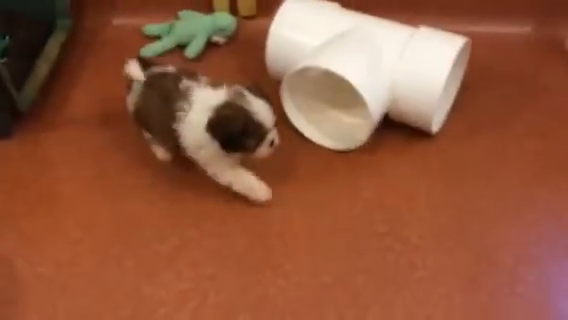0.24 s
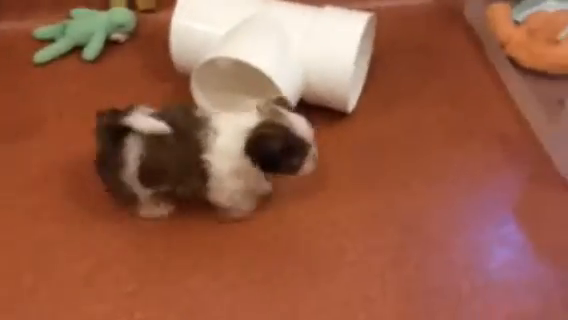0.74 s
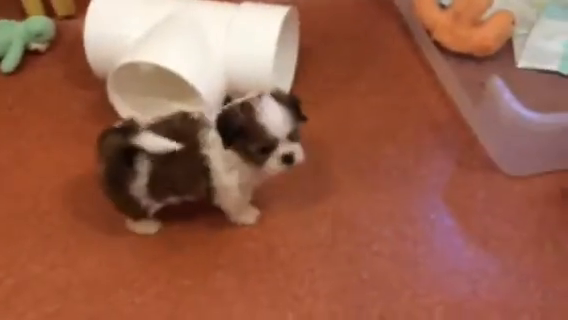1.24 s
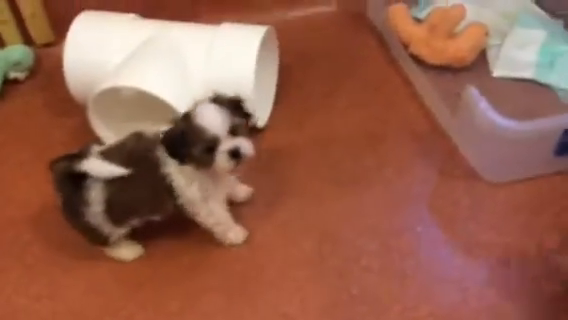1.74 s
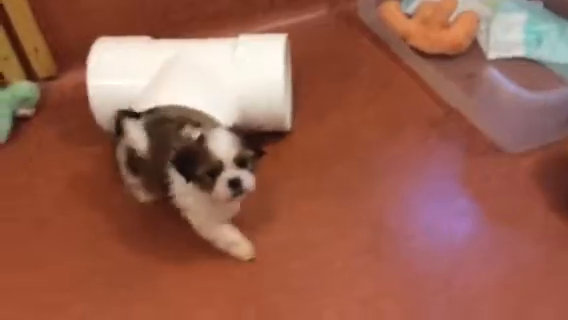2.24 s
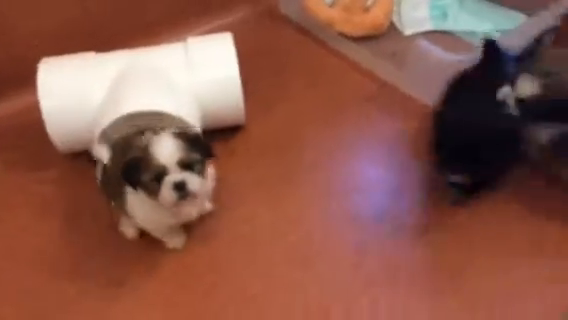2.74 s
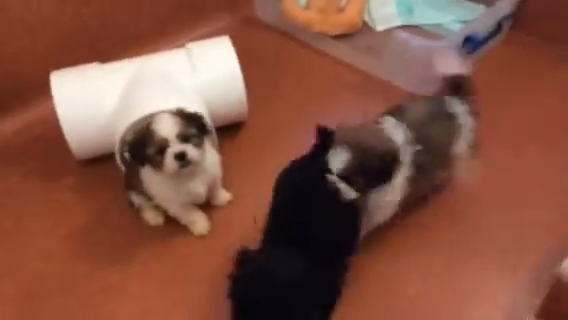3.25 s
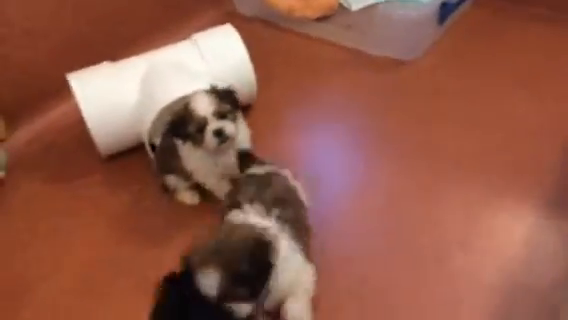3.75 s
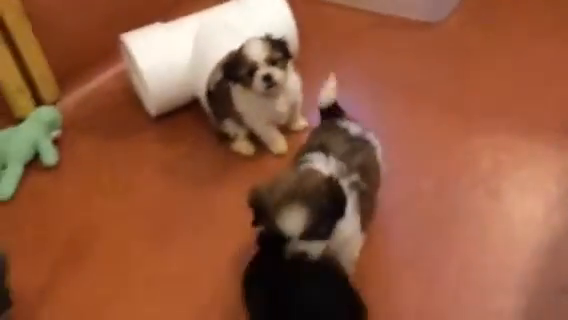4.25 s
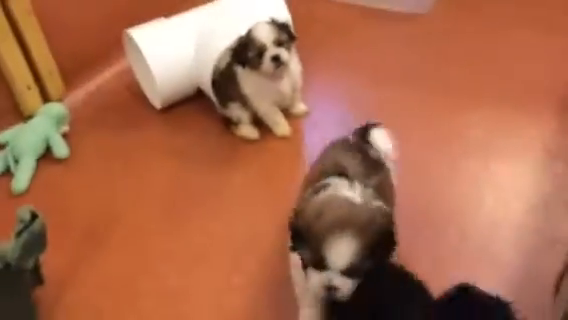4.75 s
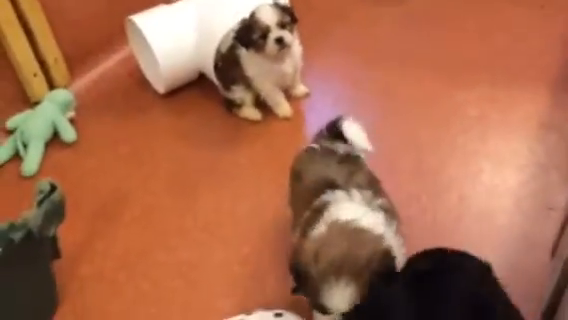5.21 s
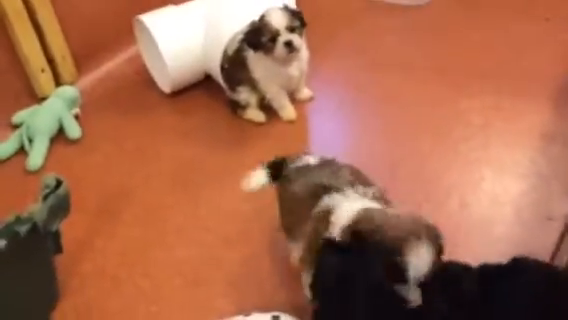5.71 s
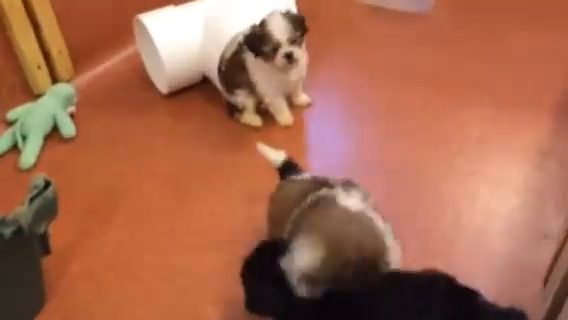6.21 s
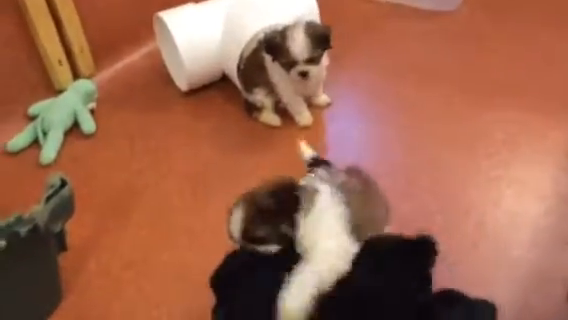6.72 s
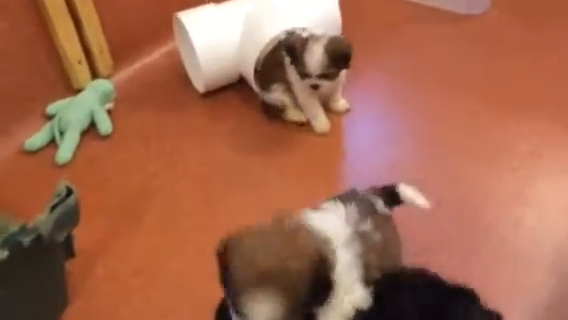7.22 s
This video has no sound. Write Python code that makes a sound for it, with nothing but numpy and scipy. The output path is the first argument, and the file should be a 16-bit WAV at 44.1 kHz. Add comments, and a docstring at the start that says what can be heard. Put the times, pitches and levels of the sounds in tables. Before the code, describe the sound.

Light paws patter and bodies flop on a resonant floor, claws clicking, a plastic pipe bumped, brief puppy grunts in a small room.

```python
"""Puppies tussling on a hard floor

Small puppies scamper and tussle indoors, close to the microphone, in a small room that answers.
Paws and bodies thump the boards as damped modes; claws tick as short noise bursts; friction is clumped noise.
A bumped plastic pipe rings through broad resonances, a bit of metal chimes through a narrow one, and
short pops are damped sines. A puppy grunts softly now and then on a gliding, hoarse tone."""
import sys
import numpy as np
from scipy import signal
from scipy.fft import rfft, irfft, next_fast_len
from scipy.io import wavfile
from scipy.ndimage import uniform_filter1d, map_coordinates

SR = 44100
rng = np.random.default_rng(int(sys.argv[2]) if len(sys.argv) > 2 else 0)


def dump(signal):
    """Clip the signal to [-1, 1] and save it as 16-bit WAV at the path in sys.argv[1]."""
    limited = np.clip(np.atleast_2d(signal).T, -1, 1)
    pcm = np.round(limited * 32767).astype(np.int16)
    wavfile.write(sys.argv[1], SR, pcm)


N = 329427  # length [samples]
RING = np.arange(SR // 2) / SR  # time since a blow [s]
TOP_HZ = 15600  # band limit

# colour of the quiet room air: (frequency [Hz], relative density [dB])
AIR_COLOUR = [(25, -4), (80, 6.5), (200, -0.5), (450, -3), (900, -16), (2000, -15.5), (5000, -27),
              (10000, -28.5), (15500, -17)]
# reverberation of the small room: (frequency [Hz], 60 dB decay time [s])
ROOM_DECAY = [(80, 0.31), (250, 0.33), (1000, 0.23), (5000, 0.17), (14000, 0.12)]
# modes of the sprung floor: (frequency [Hz], relative level [dB], 60 dB decay time [s])
BOARD_MODES = [(60, -8, 0.19), (85.3, 11.5, 0.14), (121.5, 5.5, 0.15), (173.2, -1, 0.072),
               (195.5, 1.5, 0.13), (252.3, -5, 0.11), (287.5, -6, 0.17), (317.8, 0, 0.21),
               (388, -13.5, 0.25), (466, -10, 0.1)]

# how busy the puppies are: (time [s], drive of dragging bodies [dB], drive of scuffing paws [dB])
BUSTLE_CURVE = [(0.0, -58.5, -65), (1.0, -61, -61), (1.23, -55, -57), (1.74, -66, -60), (1.98, -50, -60),
                (2.33, -53, -59), (2.81, -55, -60), (3.18, -51.5, -56.5), (3.72, -43.5, -55),
                (4.24, -63.5, -63.5), (4.58, -73, -64), (4.72, -55.5, -67.5), (5.12, -57, -63.5),
                (5.49, -65, -70), (5.93, -57.5, -67), (6.78, -73.5, -70), (7.26, -74.5, -68.5),
                (7.47, -52, -71)]
# colour of bodies dragging: (frequency [Hz], relative density [dB])
DRAG_COLOUR = [(25, -33), (50, -1), (85, -1.5), (135, -8.5), (200, -3.5), (300, -16), (450, -23.5),
               (900, -66)]
# colour of pads and fur rubbing: (frequency [Hz], relative density [dB])
RUB_COLOUR = [(150, -22), (400, -5.5), (700, 0), (1200, -1), (2200, -4.5), (3500, -8.5), (8000, -14)]
# colour of claws scratching: (frequency [Hz], relative density [dB])
SCRATCH_COLOUR = [(1200, -3.5), (2800, 1), (5200, 1), (7200, 1), (10500, -7.5), (12500, -20), (15000, -3)]
# lively scuffing drive; how steeply scuffing follows the bustle around it
BUSY_DB, SCUFF_GROWS = -58, 1.06
# each kind of friction against the bustle
DRAG_DB, RUB_DB, SCRATCH_DB, TIPS_DB = -1.5, -3.5, -3.5, -16
# the boards' answer to the dragging; how unevenly a body drags
RUMBLE_DB, DRAG_SWAY_DB = -4.5, 2.5

# longer slides of a paw or a toy:
# (middle time [s], nominal length [s], level [dB], centre frequency [Hz], width [octaves])
SLIDE_EVENTS = [(0.353, 0.057, -56.5, 420, 0.78), (0.426, 0.08, -61, 850, 1.5),
                (0.522, 0.05, -55, 1260, 0.62), (1.18, 0.2, -55.5, 1370, 0.96),
                (1.331, 0.12, -56.5, 1290, 0.84), (1.4, 0.3, -61.5, 5060, 0.24),
                (1.406, 0.36, -63, 14000, 0.26), (1.892, 0.037, -42.5, 685, 1.36),
                (1.983, 0.098, -54, 800, 2.3), (2.275, 0.092, -47.5, 1890, 1.8),
                (2.475, 0.22, -53.5, 774, 2.5), (3.245, .12, -58, 895, 2.1),
                (4.148, 0.078, -57.5, 5340, 2.2), (4.347, 0.099, -60.5, 4820, 3.5),
                (5.15, .12, -61.5, 2480, 3.2), (5.385, 0.11, -64.5, 5900, 14), (5.952, 0.11, -57, 3150, 4),
                (7.363, 0.14, -65.5, 1420, 1.5)]

# soft grunts: (time [s], length [s], middle pitch [Hz], glide [octaves], relative level [dB])
GRUNT_EVENTS = [(1.25, 0.088, 274.7, 0.148, -42), (1.317, 0.067, 300, 0.077, -38),
                (1.414, 0.057, 298, 0.066, -44.5), (1.474, 0.083, 225, -0.48, -39.5),
                (6.368, 0.088, 209, -0.3, -46), (7.301, 0.1, 195.6, -.1, -45.5)]
# share of its length at which a grunt is loudest; how much softer it starts and ends
GRUNT_CREST, GRUNT_FADE_DB = 0.58, 9

# small metal clinks: (time [s], relative level [dB], click against chime [dB], ring frequency [Hz])
CLINK_EVENTS = [(5.0097, -46, -4, 8000), (5.0139, -29, -4, 11000), (5.0374, -27.5, -4.5, 12200),
                (5.210, -54, -4.5, 11200), (5.7046, -36.5, -6, 11100), (6.037, -51, 0, 11000)]

# short pitched pops and taps: (time [s], level [dB], pitch [Hz], relative tick level [dB])
POP_EVENTS = [(0.4958, -40, 1240, -60), (1.069, -43, 1030, -70), (4.031, -46, 620, -74),
              (4.895, -47, 500, -60), (5.82, -47, 3700, -64), (5.821, -47.5, 695, -61),
              (5.866, -51.5, 790, -65), (6.179, -42, 4900, -38.5)]
POP_BODY_DB, POP_EDGE_DB = -22, -9.5  # under and over the middle of a pop's tick

# hollow knocks on plastic: (time [s], relative level [dB], crack against hollow ring [dB])
KNOCK_EVENTS = [(0.615, -47, -13), (1.141, -43, -5.5), (1.807, -36.5, 5.5), (1.873, -43.5, 5),
                (1.913, -25.5, -10), (1.929, -31.5, 1), (1.998, -23, -8.5), (2.043, -30, -8.5),
                (2.255, -38.5, -2), (2.422, -43, -4), (3.185, -43.5, -2), (3.226, -41.5, -16),
                (3.505, -37, -8.5), (3.531, -43, 0.5), (3.791, -47, -20)]
# resonances of the plastic pipe: (frequency [Hz], bandwidth [Hz], relative level [dB])
PLASTIC_MODES = [(666, 110, 1.5), (817, 70, 2.5), (899, 97, 2.5), (1113, 160, -0.5), (1454, 140, -2.5),
                 (1870, 200, -6), (2470, 420, -11.5)]
KNOCK_FLOOR_DB = -5  # the plastic also raps the floor under it

# a claw catches on its own: (time [s], relative level [dB], brightness [dB])
TICK_EVENTS = [(0.141, -47, -4.5), (0.2163, -49, 5), (.5222, -50, -12.5), (1.6203, -44.5, 7.5),
               (1.769, -51, 6), (1.9863, -40, 4.5), (2.0154, -41.5, 7), (2.0203, -44, 5),
               (2.045, -40.5, 5.5), (2.2185, -49.5, 4), (2.4086, -49, -11), (2.528, -53, 8),
               (2.8944, -47, 6.5), (3.6536, -45, 3.5), (3.7576, -37.5, -2.5), (3.8423, -45.5, 1),
               (4.0246, -52.5, 2), (4.1093, -49.5, -0.5), (4.273, -53, -3), (4.6847, -45.5, -1.5),
               (6.767, -53, 4), (6.89, -54, 6.5), (6.9681, -49, 10)]
# under and over the middle of a tick; brightness tips one against the other
CLAW_BODY_DB, CLAW_EDGE_DB = -9, -3.5
CLAW_SKID_DB = -4.5  # the skid after a tick, before filtering

# footsteps, pad and claws landing together: (time [s], relative pad level [dB], relative claw level [dB])
STEP_EVENTS = [(.611, -38, -67), (.733, -39.5, -48), (0.91, -33.5, -42), (1.108, -36.5, -45.5),
               (1.694, -34.5, -40.5), (1.805, -33, -43), (2.325, -33.5, -47.5), (2.589, -39.5, -46),
               (2.741, -35.5, -53), (2.866, -28, -49), (2.954, -31.5, -39), (3.051, -38, -49.5),
               (4.892, -38.5, -47), (5.031, -28, -47), (5.213, -40.5, -60), (5.707, -42.5, -57),
               (5.821, -39.5, -46.5), (5.866, -43.5, -47), (6.473, -42, -50)]
# relative deep modes, upper slap and claw sharpness of every step
STEP_BOOM_DB, STEP_SLAP_DB, STEP_BRIGHT_DB = -14.5, -11, 0.5
STEP_TAP_DB = -24.5  # the short woody tap of a pad

# a body drops or rolls onto the floor: (time [s], relative level [dB], relative deep boom [dB])
FLOP_EVENTS = [(0.296, -60, 8), (0.934, -43.5, 1), (1.14, -37, -3.5), (1.884, -33.5, 3),
               (1.915, -19.5, -21), (1.937, -25, -3), (1.999, -25.5, -1), (2.038, -11, -21.5),
               (3.197, -31.5, -14.5), (3.226, -24.5, -20), (3.257, -31, -10), (3.505, -32, -7),
               (3.546, -44, -2), (3.79, -19, -6), (3.801, -17.5, -13.5), (4.122, -41.5, -7.5),
               (4.524, -42.5, -2), (4.738, -32.5, -3), (5.06, -41, -6), (5.174, -43.5, -23),
               (5.6, -50.5, 3), (6.07, -34.5, -8.5), (7.268, -48.5, -7)]
FLOP_SLAP_DB = -15.5  # a furry body barely wakes the upper modes


def amp(db):
    """Decibels to gain."""
    return 10 ** (np.asarray(db) / 20)


def unit(x):
    """x at rms 1."""
    return x / np.sqrt(np.mean(x ** 2) + 1e-20)


def strength(x):
    """A blow scaled so that its loudest 4 ms have rms 1."""
    return x / np.sqrt(uniform_filter1d(x ** 2, SR // 250).max() + 1e-20)


def along(points, hz):
    """(Hz, value) points read on a log frequency axis."""
    point_hz, values = np.transpose(points)
    return np.interp(np.log(hz + 1), np.log(point_hz + 1), values)


def curves(rows):
    """One value per sample for each column after the time."""
    times, *columns = np.transpose(rows)
    return [np.interp(np.arange(N) / SR, times, column) for column in columns]


def noise():
    """White noise as long as the scene."""
    return rng.standard_normal(N)


def wobble(rate):
    """A smooth random curve, rate knots a second."""
    knots = rng.standard_normal(int(N * rate / SR) + 4)
    return map_coordinates(knots, [np.arange(N) * rate / SR])


def filtered(x, response):
    """x shaped by a complex response of frequency."""
    size = next_fast_len(len(x) + 8192)
    spectrum = rfft(x, size) * response(np.fft.rfftfreq(size, 1 / SR))
    return irfft(spectrum, size)[:len(x)]


def coloured(x, colour):
    """x given a spectral colour, at rms 1."""
    return unit(filtered(x, lambda hz: amp(along(colour, hz))))


def band(x, lo_hz, hi_hz):
    """Causal band-pass."""
    return signal.sosfilt(signal.butter(3, [lo_hz, hi_hz], 'band', fs=SR, output='sos'), x)


def burst(t60, attack):
    """Noise that rises quickly and dies away; both times in seconds."""
    return rng.standard_normal(len(RING)) * amp(-60 * RING / t60) * (1 - np.exp(-RING / attack))


def ring(modes, scatter_db, detune):
    """Damped modes whose strength and pitch are scattered, as by the place that is struck."""
    out = np.zeros(len(RING))
    for hz, db, t60 in modes:
        decay = amp(db + scatter_db * rng.normal() - 60 * RING / t60)
        out += decay * np.sin(2 * np.pi * hz * (1 + detune * rng.normal()) * RING)
    return out


def in_room(x, wet_db):
    """A blow with its own diffuse tail, each frequency dying at its own speed."""
    hz, t, z = signal.stft(rng.standard_normal(len(RING)), SR, nperseg=256)
    fading = z * amp(-60 * t / along(ROOM_DECAY, hz)[:, None])
    tail = signal.istft(fading, SR, nperseg=256)[1][:len(RING)]
    tail = tail * (1 - np.exp(-RING / 0.002))  # the tail builds up in about 2 ms
    return x + amp(wet_db) * signal.fftconvolve(x, tail / np.linalg.norm(tail))[:len(x)]


def add(track, s, x):
    """Mix x into the track at time s."""
    part = track[max(round(s * SR), 0):][:len(x)]
    part += x[:len(part)]


def room_air():
    """Steady coloured noise makes the quiet air of the room."""
    return amp(-66.5) * coloured(noise(), AIR_COLOUR)


def scuff_grains(clump_db):
    """Noise whose level flutters fast and sways slowly, like clumps of tiny slips."""
    return noise() * amp(clump_db * wobble(260) + 3.1 * wobble(22.053))


def scuffs():
    """Pads, claws and fur slide over the floor in clumps of tiny slips; stray claw tips tick among them."""
    body_db, paw_db = curves(BUSTLE_CURVE)

    # dragging noise, with the boards excited along its length
    board_ring = ring(BOARD_MODES[:6], scatter_db=1, detune=0)
    rumble = unit(signal.fftconvolve(noise(), board_ring)[:N])
    drag = amp(DRAG_DB) * coloured(noise(), DRAG_COLOUR) + amp(RUMBLE_DB) * rumble
    drag = amp(DRAG_SWAY_DB * wobble(14)) * drag

    rub = amp(RUB_DB) * coloured(scuff_grains(clump_db=1.0), RUB_COLOUR)
    scratch = amp(SCRATCH_DB) * coloured(scuff_grains(clump_db=3.5), SCRATCH_COLOUR)

    # about 30 claw tips a second, each of random strength
    tips = (rng.random(N) < 30 / SR) * amp(5 * np.minimum(rng.exponential(size=N), 2.5))
    tip_decays = signal.fftconvolve(tips, amp(-60 * RING / .012))[:N]
    tip_ticks = amp(TIPS_DB) * coloured(tip_decays * noise(), SCRATCH_COLOUR)

    scuff_gain = amp(BUSY_DB + SCUFF_GROWS * (paw_db - BUSY_DB))
    return amp(body_db) * drag + scuff_gain * (rub + scratch + tip_ticks)


def slides():
    """A slide swells and fades; its tiny slips roughen a band of noise."""
    out = np.zeros(N)
    for s, length, db, centre_hz, octaves in SLIDE_EVENTS:
        swell = np.hanning(int(1.4 * length * SR))  # the soft ends reach past the nominal length
        slips = rng.standard_normal(len(swell)) * amp(1.9 * wobble(197)[:len(swell)])

        def bell(hz):
            return np.exp(-2 * (np.log2((hz + 1) / centre_hz) / octaves) ** 2)

        hiss = unit(filtered(slips, bell))
        add(out, s - len(swell) / SR / 2, amp(db) * swell * hiss)
    return out


def grunts():
    """Closed-mouth grunts swell, glide and fade: a hoarse tone, faint overtones and air pulsed once a cycle."""
    out = np.zeros(N)
    for s, length, hz, glide, db in GRUNT_EVENTS:
        progress = (np.arange(N) / SR - s) / length
        pitch_hz = hz * 2 ** (glide * (np.clip(progress, 0, 1) - .5))
        fade_db = np.interp(progress, [0, GRUNT_CREST, 1], [-GRUNT_FADE_DB, 0, -GRUNT_FADE_DB])
        # on only during the grunt, with about 9 ms ramps
        sounding = uniform_filter1d(1. * ((progress > 0) & (progress < 1)), size=400)

        # jittered pitch, plus random sine and cosine strength for hoarseness
        phase = 2 * np.pi * np.cumsum(pitch_hz * (1 + .075 * wobble(160))) / SR
        hoarse = .42 * (wobble(170) * np.sin(phase) + wobble(170) * np.cos(phase))
        overtones = sum(amp(-11.5 - 5.3 * k) * np.sin(k * phase) for k in range(2, 5))
        breath = amp(-23) * unit(band(noise(), 290, 1600) * (1 + np.sin(phase)))
        voice = np.sin(phase) + hoarse + overtones + breath
        out += sounding * amp(db + fade_db) * np.sqrt(2) * voice
    return out


def clinks():
    """A small piece of metal is flicked: brief chatter with a very high, damped ring."""
    out = np.zeros(N)
    for s, db, contact_db, ring_hz in CLINK_EVENTS:
        chatter = burst(t60=.012, attack=.002)
        resonance = signal.iirpeak(ring_hz, 7, fs=SR)
        chime = strength(signal.lfilter(*resonance, chatter))
        click = strength(band(burst(t60=.012, attack=.001), 450, 8500))
        add(out, s, amp(db - 3.0) * in_room(chime + amp(contact_db) * click, wet_db=-4.0))
    return out


def tick(body_db, edge_db):
    """A hard tip gives a sharp dry tick and a brief skid."""
    catch = burst(t60=0.0063, attack=.00012)
    skid = amp(CLAW_SKID_DB) * burst(t60=0.04, attack=0.0015)
    contact = catch + skid
    body = amp(body_db) * strength(band(contact, 600, 2000))
    middle = strength(band(contact, 2000, 7000))
    edge = amp(edge_db) * strength(band(contact, 6500, 14500))
    return amp(-4.5) * in_room(body + middle + edge, wet_db=-4.5)


def pops():
    """A pop starts with a tick and rings for only a few cycles before the room takes over."""
    out = np.zeros(N)
    for s, db, hz, tick_db in POP_EVENTS:
        tone = strength(ring([(hz, 0, .007)], scatter_db=0, detune=0))
        add(out, s, amp(db) * in_room(tone, wet_db=-6.0))
        add(out, s, amp(tick_db) * tick(POP_BODY_DB, POP_EDGE_DB))
    return out


def plastic_shell(f):
    """Response of the hollow plastic: parallel resonances of alternating sign."""
    response = 0
    for k, (centre, width, db) in enumerate(PLASTIC_MODES):
        resonance = 1j * f * width / (centre * centre - f * f + 1j * f * width)
        response = response + (-1) ** k * amp(db) * resonance
    return response


def knocks():
    """A chattering contact rings the hollow plastic and cracks above it."""
    out = np.zeros(N)
    for s, db, crack_db in KNOCK_EVENTS:
        hollow = strength(filtered(burst(t60=0.019, attack=0.00057), plastic_shell))
        floor_rap = amp(KNOCK_FLOOR_DB) * strength(band(burst(t60=0.059, attack=0.0017), 270, 520))
        contact = burst(t60=0.024, attack=0.00053)
        crack = strength(band(contact, 2400, 6500) + amp(-9.5) * band(contact, 6000, 15000))
        knock = hollow + floor_rap + amp(crack_db) * crack
        add(out, s, amp(db - 6.5) * in_room(knock, wet_db=-2.0))
    return out


def claws():
    """Single claws catch the floor, duller or sharper by how they land."""
    out = np.zeros(N)
    for s, db, bright_db in TICK_EVENTS:
        add(out, s, amp(db) * tick(CLAW_BODY_DB - bright_db, CLAW_EDGE_DB + bright_db))
    return out


def thump(boom_db, slap_db):
    """Something soft sets the boards ringing: weight brings out deep modes, a quick slap the upper ones."""
    groups = BOARD_MODES[:3], BOARD_MODES[3:6], BOARD_MODES[6:]
    deep, middle, upper = (ring(modes, scatter_db=1.8, detune=.03) for modes in groups)
    # the deeper the modes, the slower they are set going
    boom = amp(boom_db + 4.5) * strength(deep * (1 - np.exp(-RING / 0.013)))
    body = amp(-2.0) * strength(middle * (1 - np.exp(-RING / 0.0038)))
    bright = strength(upper * (1 - np.exp(-RING / 0.002)))
    pad = strength(band(burst(t60=0.067, attack=0.0044), 172, 467))
    slap = amp(slap_db - 1.5) * strength(bright + amp(3) * pad)
    return amp(-.5) * in_room(boom + body + slap, wet_db=-12)


def flops():
    """A tumbling body thumps the floor with a soft slap, some landings deep, some not, without claws."""
    out = np.zeros(N)
    for s, db, boom_db in FLOP_EVENTS:
        add(out, s, amp(db) * thump(boom_db, FLOP_SLAP_DB))
    return out


def steps():
    """Each light footstep thumps the boards with its pad and ticks with its claws."""
    out = np.zeros(N)
    for s, pad_db, claw_db in STEP_EVENTS:
        add(out, s, amp(pad_db) * thump(STEP_BOOM_DB, STEP_SLAP_DB))
        tap = strength(band(burst(t60=0.044, attack=0.00082), 450, 1150))
        add(out, s, amp(pad_db + STEP_TAP_DB) * in_room(tap, wet_db=-6))
        claw = tick(CLAW_BODY_DB - STEP_BRIGHT_DB, CLAW_EDGE_DB + STEP_BRIGHT_DB)
        add(out, s, amp(claw_db) * claw)
    return out


def scene():
    """The puppies and what they bump, over the quiet air of the room."""
    friction = scuffs() + slides()
    objects = clinks() + pops() + knocks()
    paws_and_bodies = claws() + flops() + steps()
    return (room_air() + friction + grunts() + objects + paws_and_bodies)[None]


def record(dry):
    """The microphone sheds the deepest bass and softens the very top; nothing is kept above the band limit."""
    thinned = signal.sosfilt(signal.butter(2, 36, 'high', fs=SR, output='sos'), dry)

    def treble(hz):
        softening_db = along([(11500, 0), (13000, -6.5), (15500, -6.5)], hz)
        return amp(softening_db) * (hz < TOP_HZ)

    return np.array([filtered(x, treble) for x in thinned])


dry = scene()
out = record(dry)
dump(out)
```